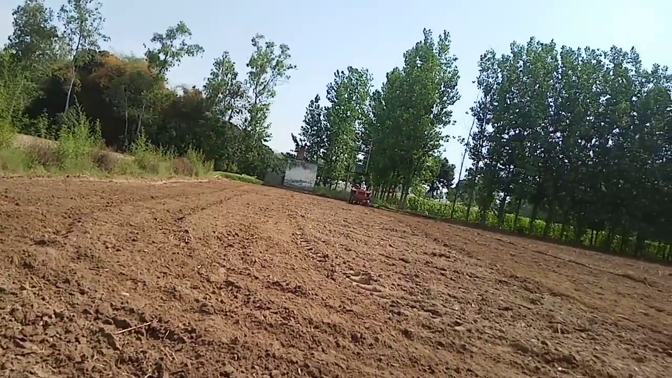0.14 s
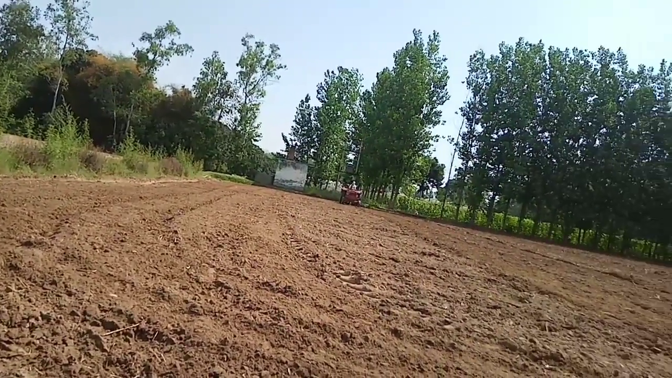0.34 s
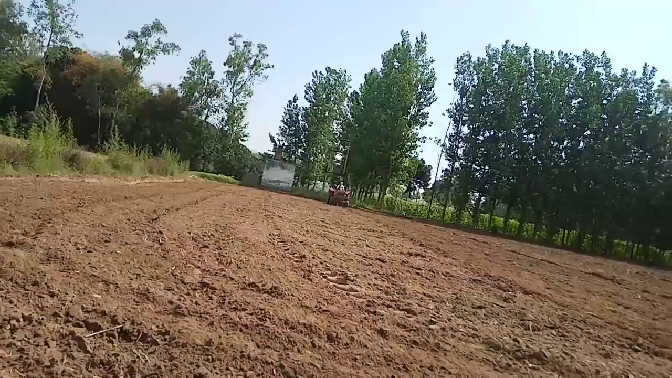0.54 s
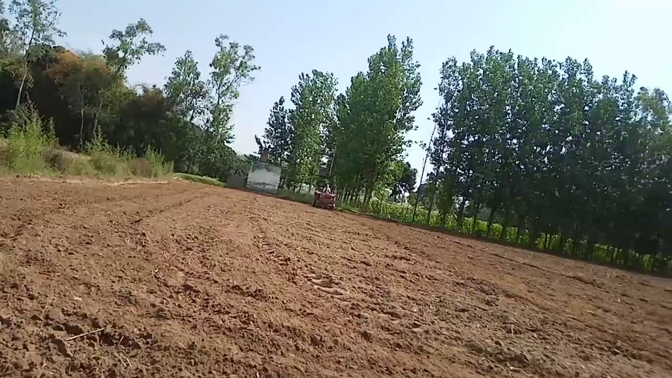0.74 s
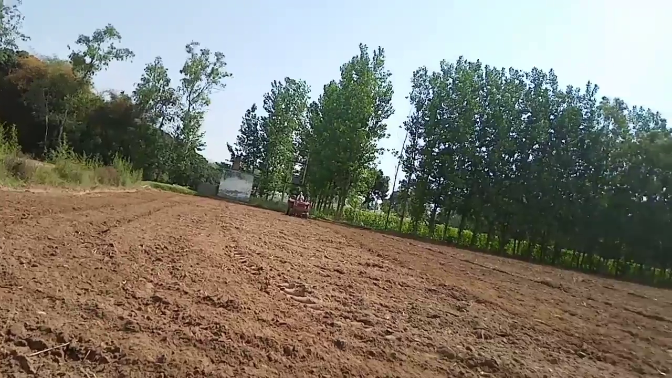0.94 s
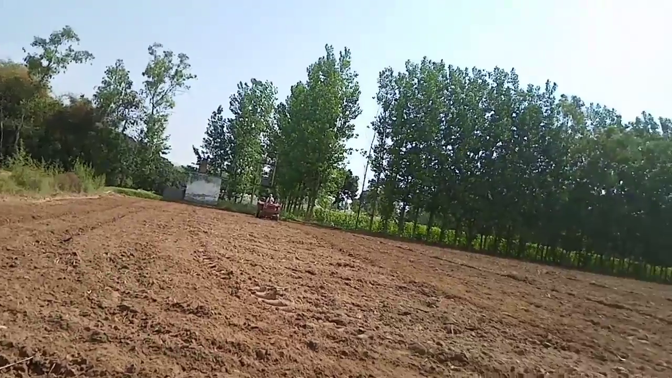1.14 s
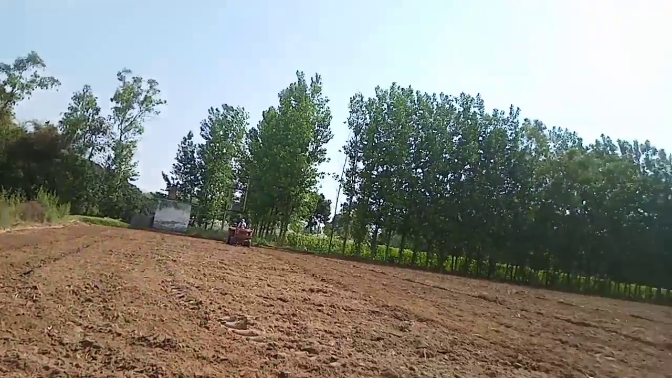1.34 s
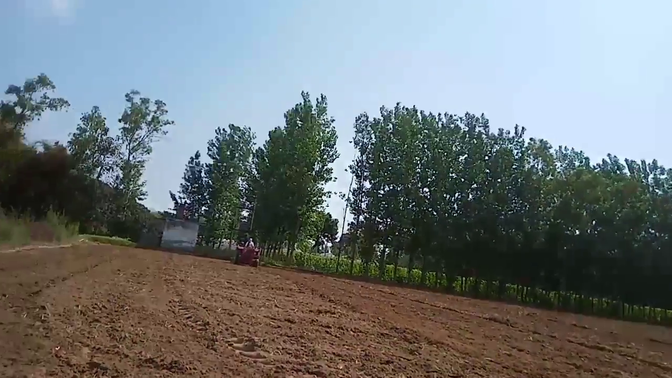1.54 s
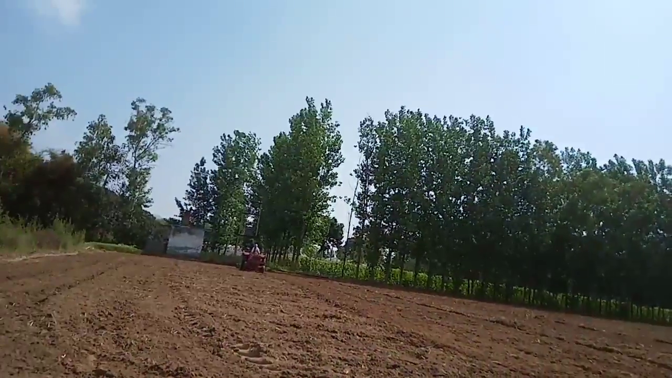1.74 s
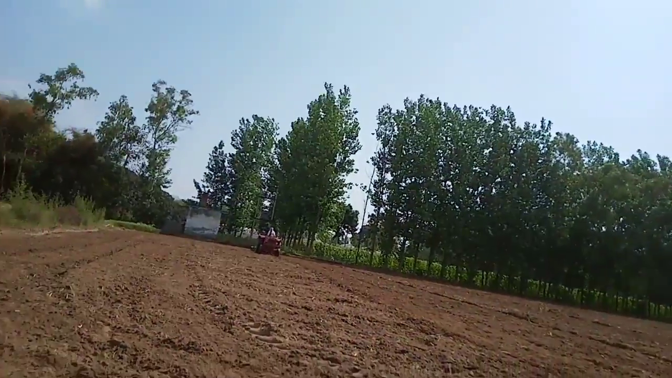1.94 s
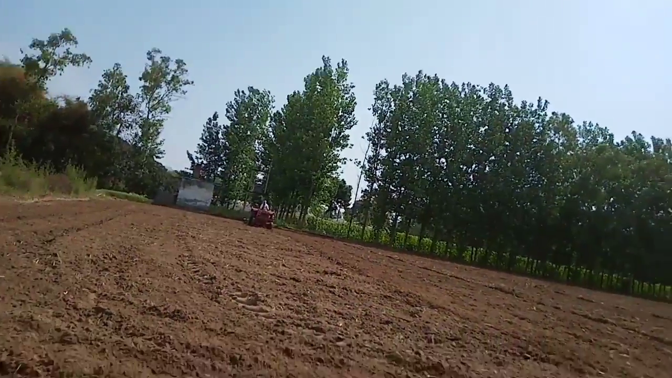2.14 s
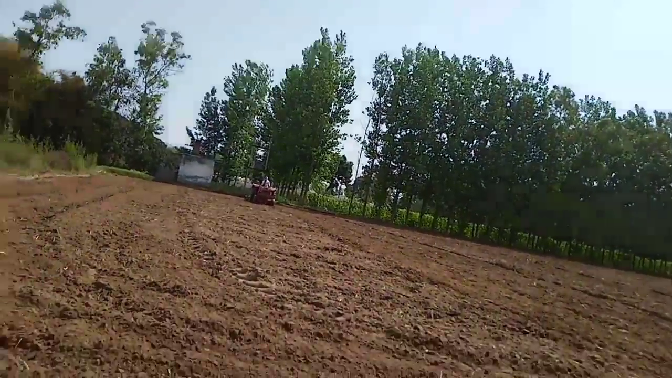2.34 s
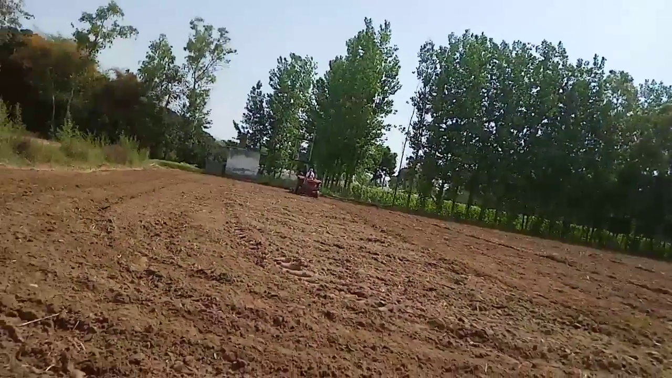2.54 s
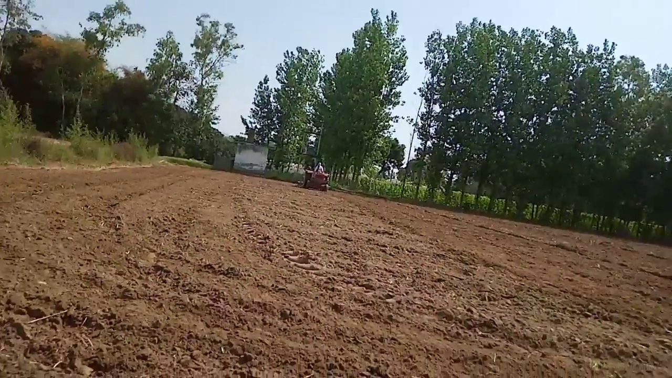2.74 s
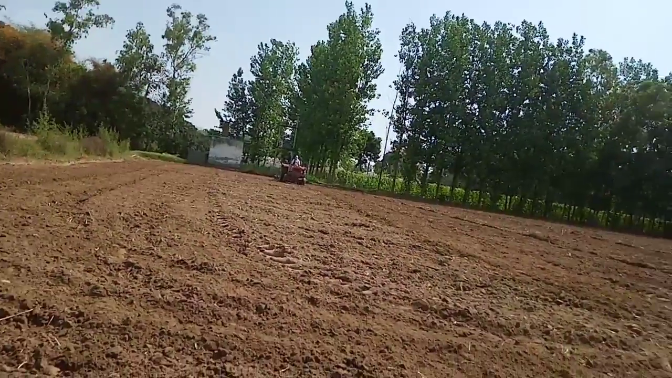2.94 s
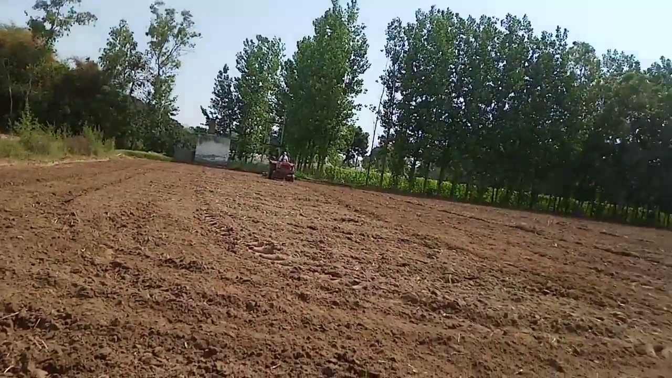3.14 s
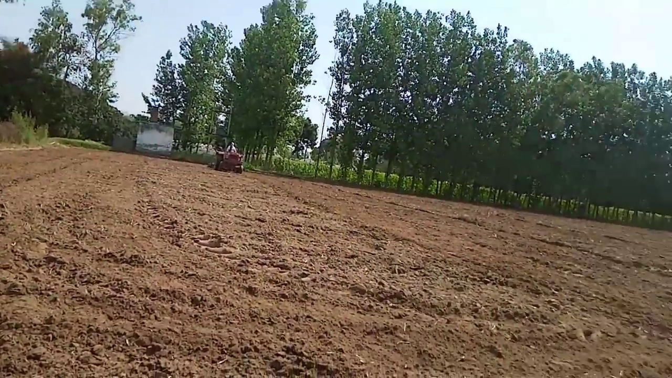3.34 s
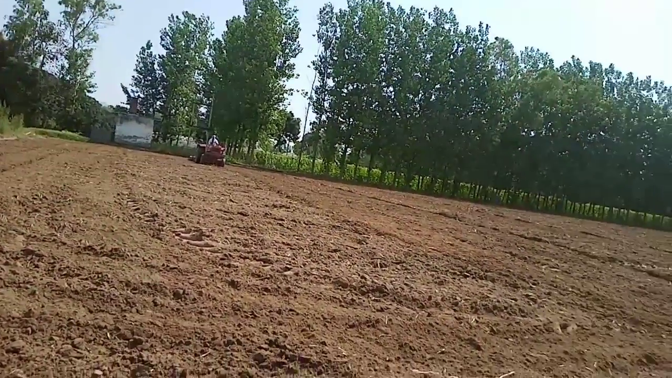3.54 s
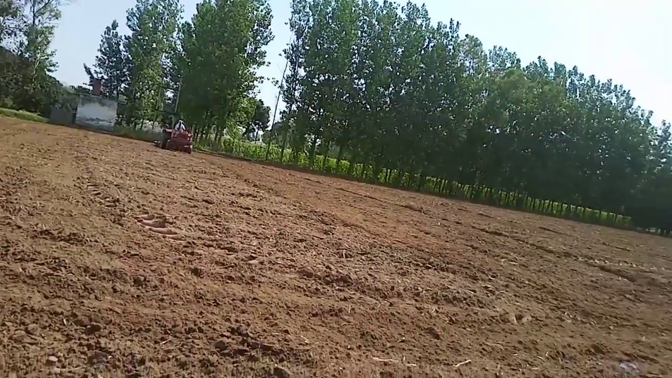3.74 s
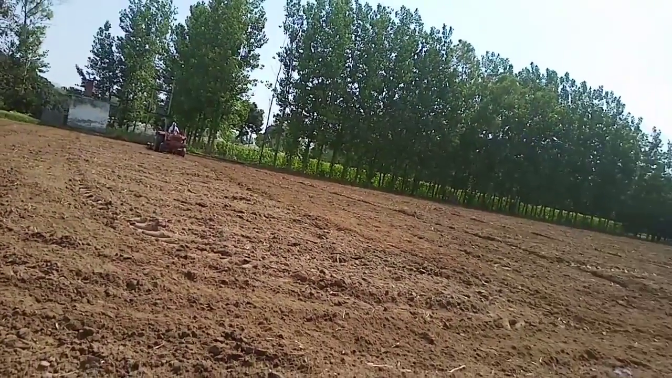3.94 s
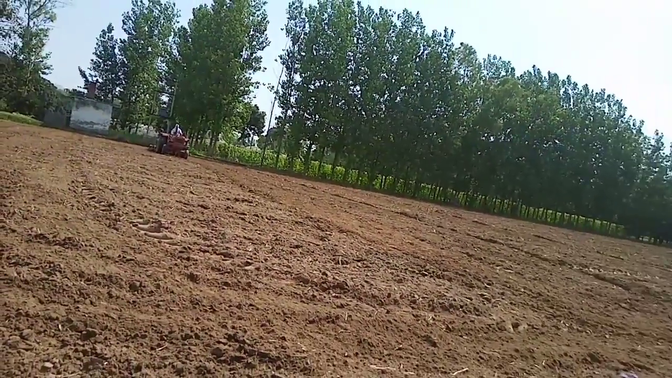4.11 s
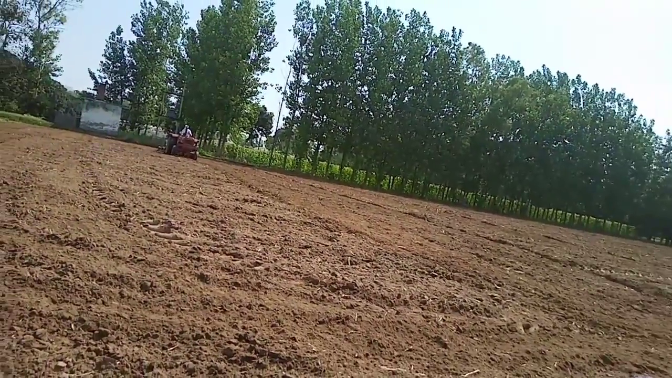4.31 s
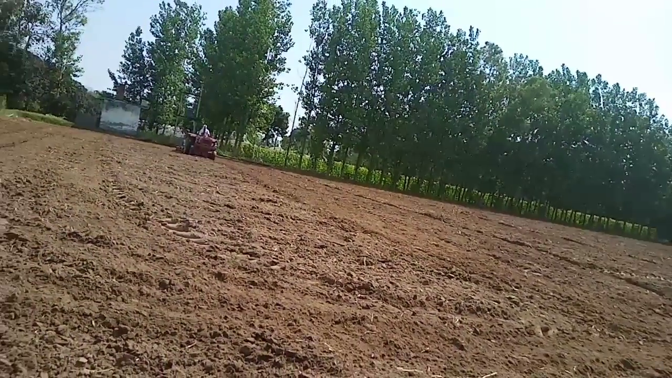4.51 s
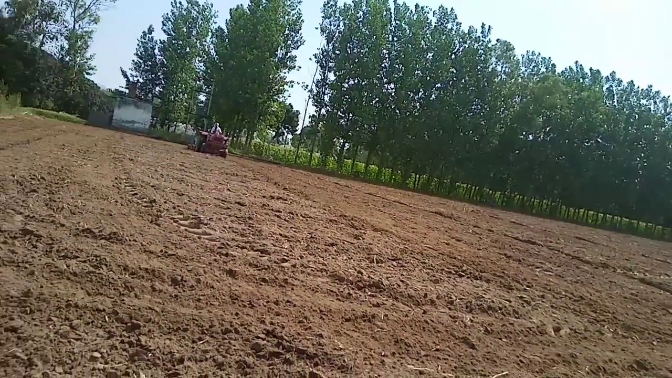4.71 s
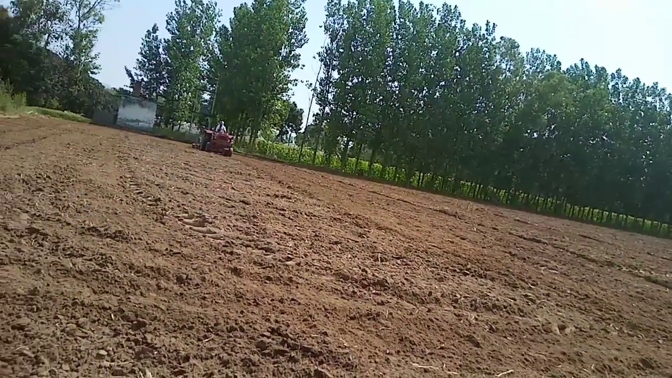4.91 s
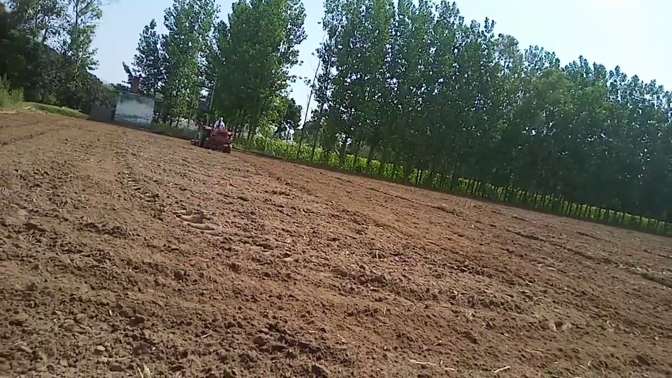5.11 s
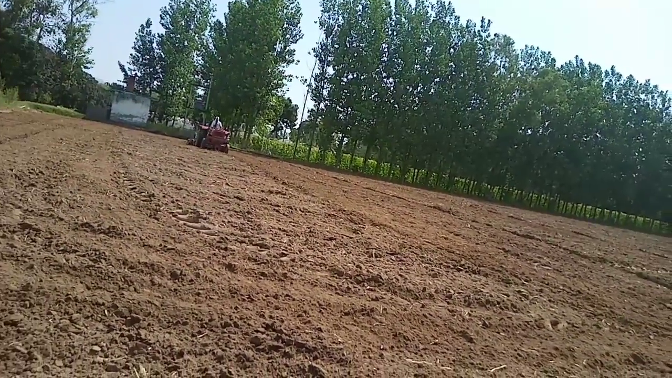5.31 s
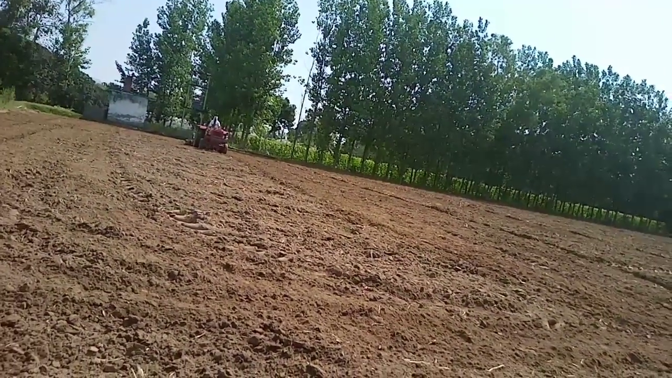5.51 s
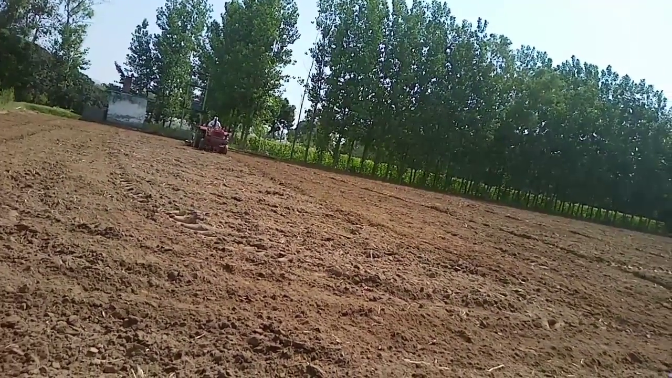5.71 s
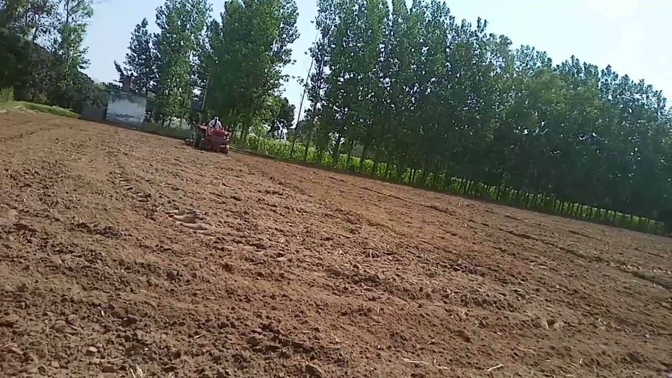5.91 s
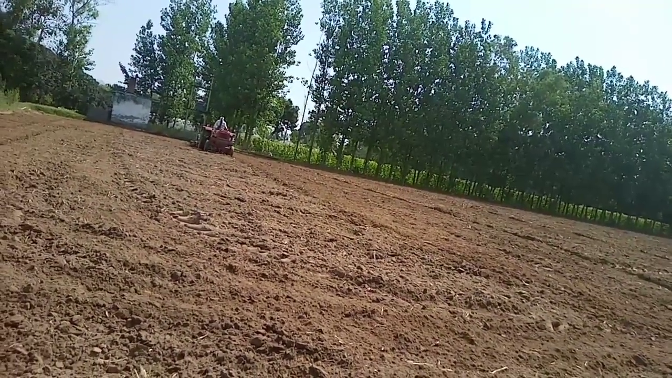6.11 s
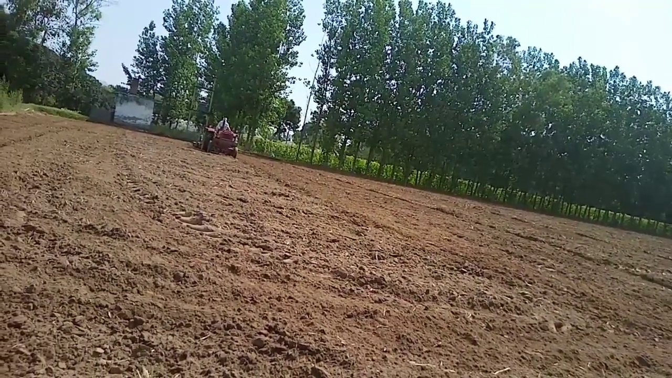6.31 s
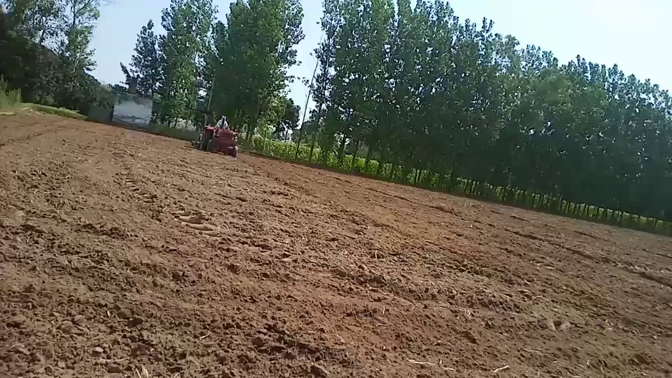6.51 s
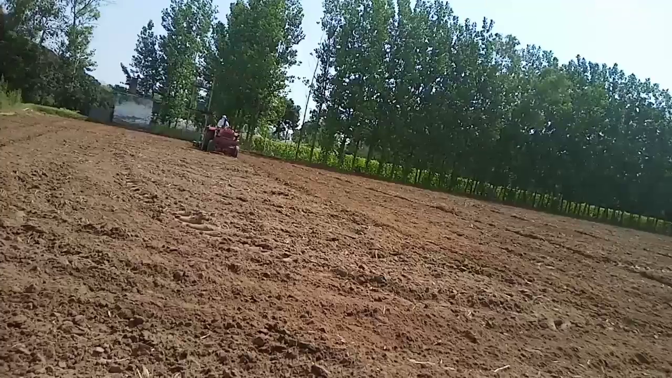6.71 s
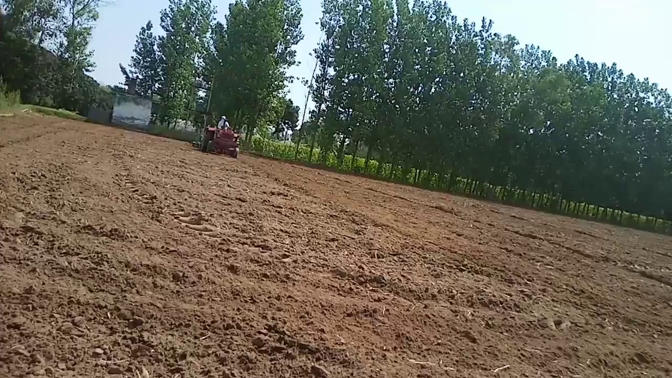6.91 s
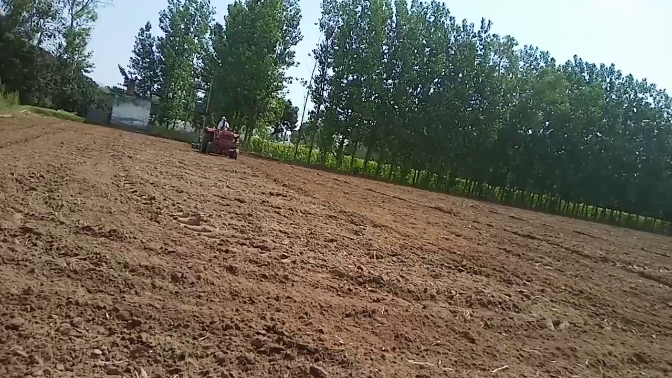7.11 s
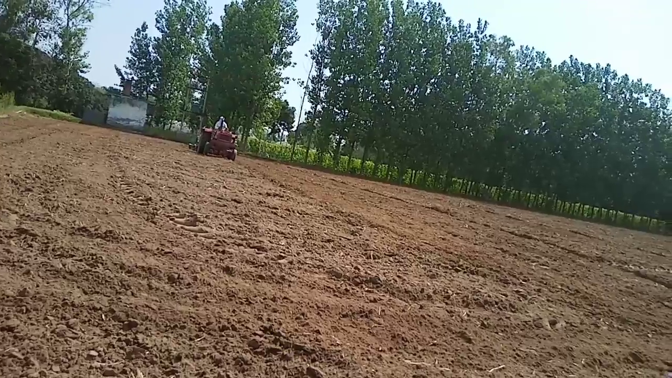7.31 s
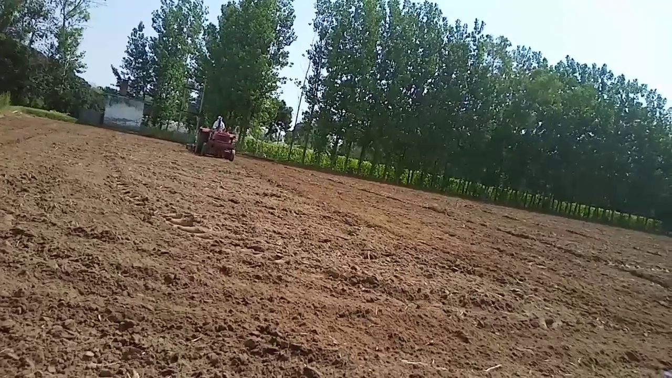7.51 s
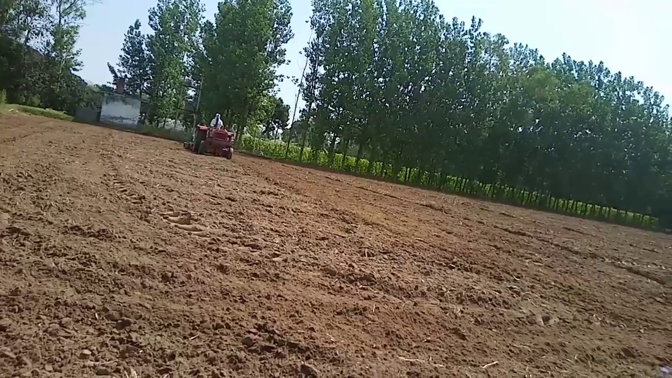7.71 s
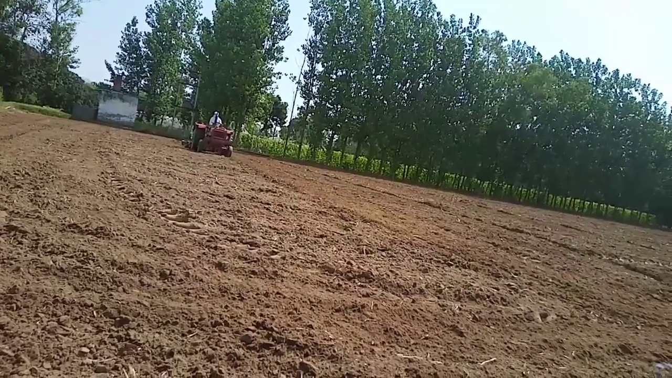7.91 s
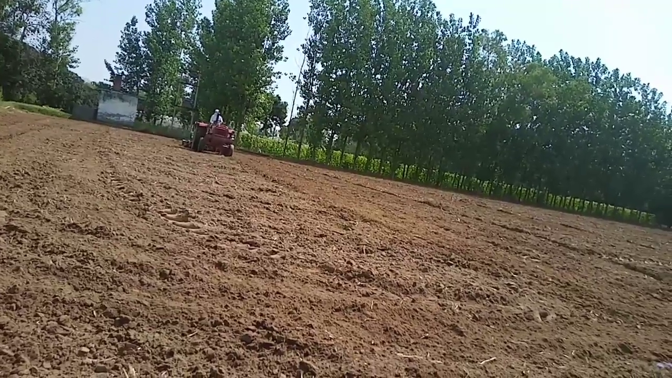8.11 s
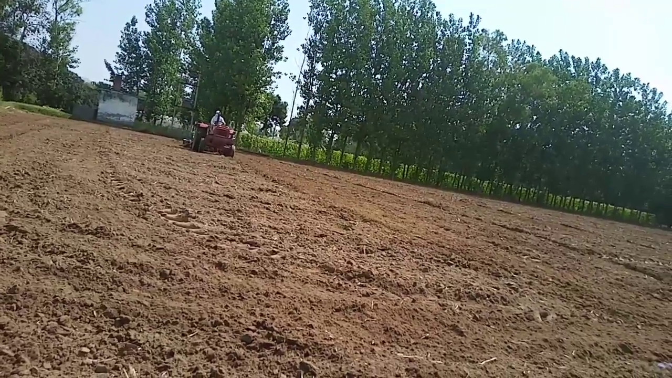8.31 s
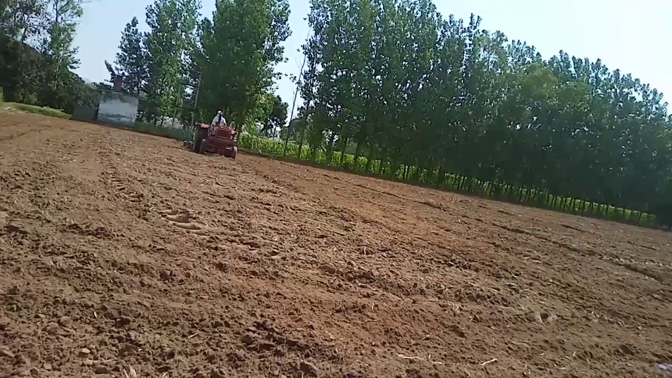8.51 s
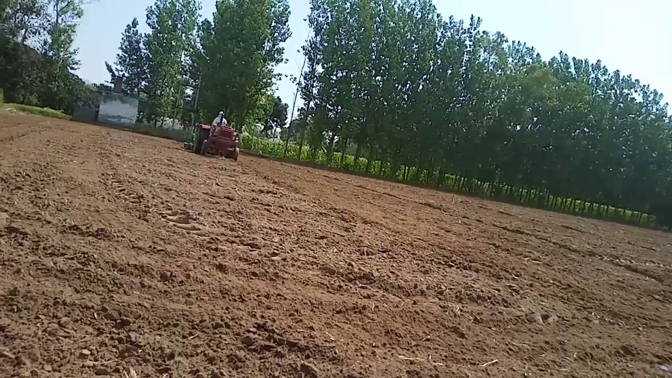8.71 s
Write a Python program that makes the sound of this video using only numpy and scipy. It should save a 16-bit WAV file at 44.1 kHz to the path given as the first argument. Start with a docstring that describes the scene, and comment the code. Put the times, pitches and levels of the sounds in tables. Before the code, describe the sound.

A diesel tractor drones and clatters steadily across an open tilled field, slowly growing louder as it nears, with a few faint bird chirps.

```python
"""Diesel tractor at work, coming nearer

A four-cylinder diesel tractor pulls a disc harrow over a tilled field and slowly comes nearer.
Each firing feeds a deep exhaust drone of engine orders and rumble, a knock of shaken block resonances,
a clatter of ringing casings, and a sharp injector tick with a longer rasp, both of filtered grit.
The treble shifts colour with distance and direction; gliding sine whistles make a bird's chirps,
and a few fast-dying modes make one small click close by."""
import sys
import numpy as np
from scipy import signal
from scipy.fft import rfft, irfft
from scipy.io import wavfile
from scipy.ndimage import uniform_filter1d

SR = 44100
rng = np.random.default_rng(int(sys.argv[2]) if len(sys.argv) > 2 else 0)


def generate_wav(sig):
    """Save sig (samples, or channels by samples) to the path in sys.argv[1] as 16-bit PCM at SR."""
    pcm = np.round(np.clip(np.atleast_2d(sig).T, -1, 1) * 32767).astype(np.int16)
    wavfile.write(sys.argv[1], SR, pcm)


N = 385875
TIME = np.arange(N) / SR  # s

# engine speed, sagging and recovering under the harrow's load: start_s, firings_per_s
FIRING_RATE = [(0.0, 58.85), (1.6, 58.88), (1.75, 58.04), (2.55, 57.9), (2.8, 58.73), (3.95, 57.04),
               (4.85, 58.18), (5.3, 57.45), (6.9, 57.46), (7.0, 56.87), (8.3, 57.87), (8.75, 56.25)]
# exhaust lines: multiple_of_firing_rate, near_db, lost_when_far_db (negative: stronger when far)
EXHAUST_ORDERS = [(.25, -25, 3), (0.748, -34, 0), (1.001, -12, -3.5), (1.752, -27, -5), (2, 0.5, -3),
                  (2.25, -50, 6), (2.5, -25.5, -7.5), (2.75, -23, 10), (3, -12, 14.5), (3.389, -23.5, 13),
                  (3.499, -36, 21), (3.748, -33, 26), (4, -22, 23), (5, -30, 23)]
# spectrum of the uneven exhaust puffs: pitch_hz, relative_db
RUMBLE_COLOUR = [(20, -13), (35, -18), (50, -16), (75, -3), (100, 2.5), (125, -2), (150, -9), (200, -9.5),
                 (235, -22), (290, -41), (400, -49.5)]
# gain of the exhaust drone, rising unevenly as the tractor nears: start_s, gain_db
DRONE_GAIN = [(0, -31), (1.6, -30.5), (2.35, -27.5), (2.8, -29), (4.05, -24.5), (4.75, -27), (5.1, -24.5),
              (6.65, -22.5), (8.75, -21.5)]
# spectra of the block's knock and of its low thud: pitch_hz, relative_db
KNOCK_COLOUR = [(330, -25.5), (430, -54), (500, -9), (590, 0), (750, 1), (860, 1), (970, 1), (1120, -4),
                (1280, -3.5), (1440, -17.5), (1800, -16), (3000, -29)]
THUD_COLOUR = [(200, -12.5), (250, -4), (310, -7), (375, -7), (405, -6), (432, 4.5), (465, -0.5), (520, 0),
               (700, -33.5)]
# the thud moves with the drone, but further: near_db, db_per_drone_db
THUD_FOLLOWS_DRONE = (-43.5, 2.85)
# spectrum of the mechanical clatter: pitch_hz, relative_db
CLATTER_COLOUR = [(900, -26), (1450, -12), (1620, -1), (1800, 0), (1950, -7.5), (2200, -1.5), (2450, -2.5),
                  (2900, -4), (3300, -3), (3800, -7), (4300, -7.5), (4800, -5.5), (7000, -11.5),
                  (10000, -35)]
# ringing of the casings: pitch_hz, width_hz, relative_db
CASING_MODES = [(1706, 69, -6), (2170, 8.8, -15.5), (2630, 16, -16.5), (2735, 84, -16.5), (2938, 18, -11),
                (3735, 56, -13)]
# spectra of the injectors' rasp and tick: pitch_hz, relative_db
RASP_COLOUR = [(2500, -16), (4200, 3.5), (4700, -6), (5200, 1), (5700, 2.5), (6200, -3), (6700, 4),
               (7300, -2), (8000, -7.5), (9000, -6), (12000, -22)]
TICK_COLOUR = [(3000, -27), (6000, -2), (7500, -1.5), (8800, -4.5), (10000, 1.5), (11000, -0.5),
               (12000, -3.5), (13000, -12), (14000, -12), (16000, -26)]
# one row a cylinder, in firing order: relative_knock_db, relative_tick_db
CYLINDER_LEVELS = [(-1, 6.5), (-3, 6.5), (0.5, 7), (-1, 8)]
# gain shared by rasp and tick: start_s, gain_db
TREBLE_GAIN = [(0, -35.5), (.37, -41), (.5, -33.5), (.62, -43), (.8, -34), (.95, -43.5), (1.8, -38.5),
               (2.2, -43), (2.3, -38), (3.55, -37), (3.9, -33.5), (4.75, -38.5), (5.35, -36), (6.3, -37.6),
               (7.15, -34.5), (7.7, -36.5), (8.75, -33.5)]
# gain over the approach (the tick's is against the rasp): near_db, lost_when_far_db, bend
KNOCK_DISTANCE = (-32.5, 11.6, 0.77)
CLATTER_DISTANCE = (-31, 7.94, 0.99)
TICK_DISTANCE = (-5, 8.9, 1.1)
TICK_SWING = 0.2  # extra dB of tick for each dB that the treble swells
# moving air makes each part waver: depth_db (rms), corner_hz
DRONE_AIR = (0.53, 4)
KNOCK_AIR = (1, 8.4)
THUD_AIR = (2.7, 12)
CLATTER_AIR = (0.28, 4.3)
TICK_AIR = (0.89, 5.6)
# treble colour drifting as the microphone turns:
# start_s, rasp_peak_hz, presence_dip_depth (0-1), tick_peak_hz
FACING_COLOUR = [(0, 6600, 0, 10800), (.8, 7100, 0.07, 10700), (1.4, 5800, 0.47, 10500),
                 (1.95, 5640, 0.16, 10700), (2.35, 7500, 0, 11000), (3.9, 6330, 0.7, 11000),
                 (5.2, 5740, 0.9, 9600), (6.4, 5250, 0.53, 11000), (8.75, 6200, 0.45, 10800)]
# brief midrange hollow as the microphone turns: centre_s, half_length_s, pitch_hz, width_hz, depth (0-1)
MIDRANGE_HOLLOW = (2.86, 0.39, 1200, 300, 0.76)
# delay of the soil's echo, longest past the middle: start_s, lag_ms
GROUND_LAG = [(0, 0.81), (3.2, 0.792), (5.3, 1.106), (8.75, 0.81)]
# nearby click: start_s, gain_db
CLICK_EVENT = (1.17195, -13.5)
# resonances of the click: pitch_hz, relative_db, t60_s
CLICK_RESONANCES = [(2680, 1, .006), (3900, -8, .004), (5400, 0, .003), (6900, -5, .004), (9000, -4, .0025),
                    (11000, -4, .002), (13600, -15, .003)]
# bird calls in the trees: start_s, length_s, first_hz, last_hz, level_db (rms at the swell's top)
BIRD_CALLS = [(1.01, .11, 3230, 2950, -47), (1.945, .075, 3700, 3150, -42), (4.05, .08, 3080, 2950, -44),
              (6.5, .08, 3560, 3680, -38), (8.39, .07, 3490, 3370, -40)]
EDGE_HZ = 15750  # top of the recorder's band


def exhaust(firings, far):
    """Engine orders from the pipe over the rumble of unequal puffs; a long path makes them flutter."""
    lines = np.zeros(N)
    for order, near_db, lost_db in EXHAUST_ORDERS:
        lines += gain_of(near_db - lost_db * far) * np.cos(2 * np.pi * order * firings)
    flutter = gain_of((.7 + .8 * far) * wander(18))
    rumble = gain_of(-16) * colour(rng.standard_normal(N), RUMBLE_COLOUR)
    # the upper rumble fills in as the path shortens
    rumble = rumble + (1.3 - 1.46 * far ** 2) * resonate(rumble, 232, 62)
    return gain_of(curve(DRONE_GAIN)) * waver(*DRONE_AIR) * (lines * flutter + rumble)


def knock(firings, far, size=3072):
    """Combustion shakes the block; part of the shake repeats with each full engine cycle."""
    cylinder_db = np.array(CYLINDER_LEVELS)[:, 0]
    place = (firings / len(cylinder_db) % 1) * size
    repeating = evened(np.interp(place, np.arange(size), rng.standard_normal(size)))
    blows = bursts(firings, start=.55, rise=.5, fall=.17, floor_db=-5, scatter_db=1.7,
                   cylinder_db=cylinder_db)
    drive = blows * (rng.standard_normal(N) + 0.41 * repeating)
    body = colour(drive, KNOCK_COLOUR)
    # from afar mostly the strongest resonance carries
    body = body + 1.3 * far ** 2 * resonate(body, 745, 90)
    # the energy of each stroke follows its blow, whatever the fine detail
    stroke = size // len(cylinder_db)  # samples, about one firing
    wanted_power = uniform_filter1d(blows ** 2, stroke)
    body = evened(body * np.sqrt(wanted_power / uniform_filter1d(body ** 2, stroke)))
    body = approach(far, *KNOCK_DISTANCE) * waver(*KNOCK_AIR) * body
    # the loose soil mostly swallows the block's low thud over a long path
    near_db, swing = THUD_FOLLOWS_DRONE
    thud_db = near_db + swing * (curve(DRONE_GAIN) - DRONE_GAIN[-1][1])
    thud = gain_of(thud_db) * waver(*THUD_AIR) * colour(drive, THUD_COLOUR)
    return body + thud


def injectors(firings, far):
    """A sharp tick opens each firing, and a longer rasp follows; the air takes more of the tick."""
    cylinder_db = np.array(CYLINDER_LEVELS)[:, 1]
    tick = grit(3.4) * bursts(firings, start=.5, rise=.074, fall=.24, floor_db=0, scatter_db=1.5,
                              cylinder_db=cylinder_db)
    rasp = grit(3.5) * bursts(firings, start=.45, rise=.24, fall=.37, floor_db=0, scatter_db=1.72,
                              cylinder_db=cylinder_db)
    rasp, tick = colour(rasp, RASP_COLOUR), colour(tick, TICK_COLOUR)
    # the direction of arrival favours one band of each
    rasp = evened(rasp + 6.3 * resonate(rasp, curve(FACING_COLOUR), 1200))
    tick = evened(tick + 1.6 * resonate(tick, curve(FACING_COLOUR, axis=3), 1600))
    treble_db = curve(TREBLE_GAIN)
    swing = gain_of(TICK_SWING * (treble_db - treble_db.mean()))
    tick = tick * approach(far, *TICK_DISTANCE) * waver(*TICK_AIR) * swing
    return gain_of(treble_db) * (rasp + tick)


def clatter(firings, far):
    """Each firing slaps the pistons; gears rattle in between, and both ring the casings."""
    drive = grit(2.5) * bursts(firings, start=.68, rise=.2, fall=.12, floor_db=1.8, scatter_db=1.2,
                               cylinder_db=np.array(CYLINDER_LEVELS)[:, 0])
    ringing = np.zeros(N)
    for hz, width, db in CASING_MODES:
        ringing += gain_of(db) * evened(resonate(drive, hz, width))
    body = evened(colour(drive, CLATTER_COLOUR) + gain_of(-8) * evened(ringing))
    return approach(far, *CLATTER_DISTANCE) * waver(*CLATTER_AIR) * body


def click(size=1024):
    """A tiny hard tap that dies within milliseconds; so small a thing radiates no bass."""
    start_s, gain_db = CLICK_EVENT
    out, age, ring = np.zeros(N), TIME[:size], np.zeros(size)
    for k, (hz, db, t60) in enumerate(CLICK_RESONANCES):
        sign = (-1) ** (k // 2)
        ring += sign * gain_of(db - 60 * age / t60) * np.sin(2 * np.pi * hz * age)
    no_bass = signal.butter(2, 2000, "highpass", fs=SR, output="sos")
    add(out, start_s, gain_of(gain_db) * signal.sosfilt(no_bass, ring))
    return out


def birds():
    """Short gliding whistles, each swelling and fading, with a slight random quaver in pitch."""
    out, quaver = np.zeros(N), 1 + .006 * wander(60)
    for start_s, length_s, first_hz, last_hz, db in BIRD_CALLS:
        part = np.linspace(0, 1, round(length_s * SR))
        hz = first_hz + (last_hz - first_hz) * part
        hz = hz * quaver[round(start_s * SR):][:len(part)]
        swell = np.sqrt(2) * np.sin(np.pi * part)
        add(out, start_s, gain_of(db) * swell * np.sin(2 * np.pi * np.cumsum(hz) / SR))
    return out


def over_ground(x, reflection):
    """The direct sound plus its slightly later reflection from the soil, which combs the spectrum."""
    lag_s = curve(GROUND_LAG) / 1000
    return (x + reflection * np.interp(TIME - lag_s, TIME, x)) / np.hypot(1, reflection)


def hollowed(x):
    """A resonance subtracted from the midrange: a dip that opens and closes again."""
    centre_s, half_length_s, hz, width, depth = MIDRANGE_HOLLOW
    opening = np.exp(-((TIME - centre_s) / half_length_s) ** 4)
    return x - np.clip(depth, 0, 1) * opening * resonate(x, hz, width)


def approach(far, near_db, lost_db, bend):
    """Gain of a part of the tractor at a distance (far: 1 at the start, 0 at the end)."""
    return gain_of(near_db - lost_db * far ** bend)


def waver(depth_db, corner_hz):
    """Gain that drifts at random with the moving air."""
    return gain_of(depth_db * wander(corner_hz))


def bursts(firings, start, rise, fall, floor_db, scatter_db, cylinder_db):
    """An envelope that swells and dies once a firing (times in firings), at random sizes over a floor."""
    number, age = np.divmod(firings - start + 2, 1)
    number = number.astype(int)
    size_db = np.asarray(cylinder_db)[number % len(cylinder_db)]
    size_db = size_db + scatter_db * rng.standard_normal(N)[number]
    shape = evened((1 - np.exp(-age / rise)) ** 2 * np.exp(-age / fall))
    return np.hypot(shape * gain_of(size_db), gain_of(floor_db))


def grit(spread_db):
    """Noise of rms 1 with a fast random gain, rough like many tiny impacts of unequal size."""
    return evened(rng.standard_normal(N) * gain_of(spread_db * wander(2800)))


def colour(x, points, size=8192):
    """Minimum-phase filter with the given spectrum, up to 30 dB lower past its ends; result has rms 1."""
    hz, db = np.transpose(points)
    log_hz = np.log(abs(np.fft.fftfreq(size, 1 / SR)) + 1)
    outside = abs(log_hz - np.clip(log_hz, np.log(hz[0]), np.log(hz[-1])))
    beyond_db = np.minimum(60 * outside, 30)
    log_gain = np.log(gain_of(np.interp(log_hz, np.log(hz), db) - beyond_db))
    # the Hilbert transform of the log gain gives the phase of a causal filter
    ring = np.fft.ifft(np.exp(signal.hilbert(log_gain).conj())).real[:size // 2]
    return evened(signal.oaconvolve(x, ring)[:N])


def resonate(x, hz, width):
    """Shifts hz (a number or a curve) down to zero, smooths, and shifts back: a resonance of gain 1."""
    carrier = np.exp(2j * np.pi * np.cumsum(hz * np.ones(N)) / SR)
    r = np.exp(-np.pi * width / SR)
    return 2 * (carrier * signal.lfilter([1 - r], [1, -r], x / carrier)).real


def wander(corner_hz):
    """Smooth random drift of rms 1, its spectrum falling away above the corner."""
    hz = np.fft.rfftfreq(N, 1 / SR)
    return evened(irfft(rfft(rng.standard_normal(N)) / (1 + (hz / corner_hz) ** 2), N))


def curve(rows, axis=1):
    """One column of a time table, at every sample."""
    rows = np.asarray(rows)
    return np.interp(TIME, rows[:, 0], rows[:, axis])


def evened(x):
    """Scales to rms 1."""
    return x / np.sqrt(np.mean(x ** 2) + 1e-20)


def gain_of(db):
    """Decibels to amplitude."""
    return 10 ** (np.asarray(db) / 20)


def add(mix, start_s, sound):
    """Lays a short sound into the mix."""
    part = mix[round(start_s * SR):][:len(sound)]
    part += sound[:len(part)]


def scene():
    """One count of firings times every engine layer; distance falls steadily."""
    firings = np.cumsum(curve(FIRING_RATE)) / SR - .183
    far = 1 - TIME / TIME[-1]
    treble = over_ground(injectors(firings, far), reflection=.3) + clatter(firings, far)
    presence_dip = np.clip(curve(FACING_COLOUR, axis=2), 0, 1)
    treble = treble - presence_dip * resonate(treble, 4110, 570)
    tractor = exhaust(firings, far) + hollowed(knock(firings, far) + treble)
    return (tractor + click() + birds())[None]


def record(dry):
    """The recorder's band limit: a linear-phase lowpass."""
    lowpass = signal.firwin(511, EDGE_HZ, window=("kaiser", 9), fs=SR)
    return signal.oaconvolve(dry, lowpass[None], "same")


dry = scene()
out = record(dry)
generate_wav(out)
```